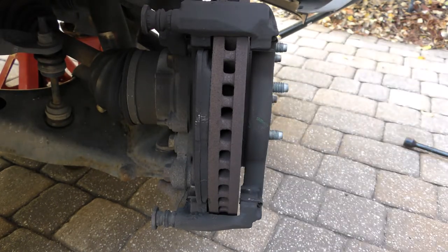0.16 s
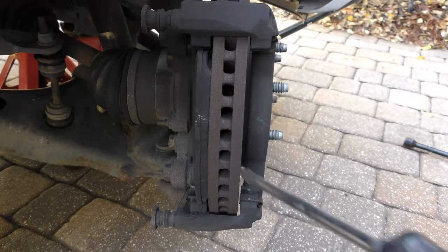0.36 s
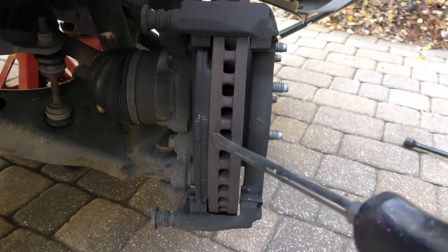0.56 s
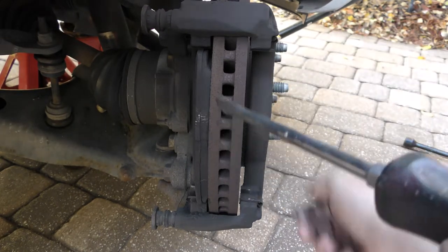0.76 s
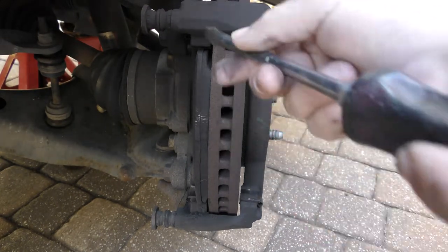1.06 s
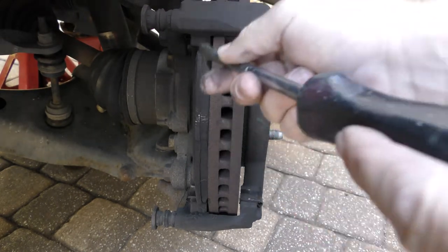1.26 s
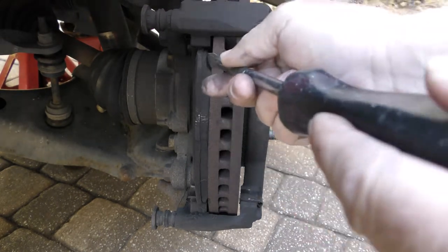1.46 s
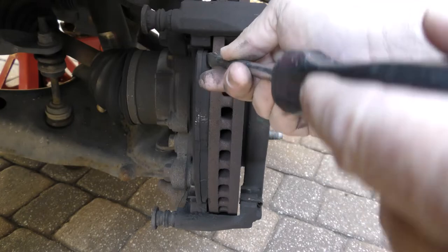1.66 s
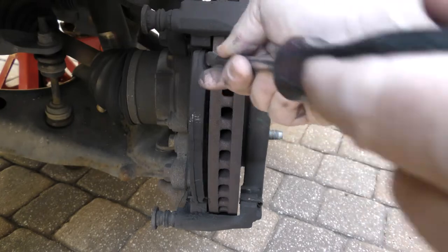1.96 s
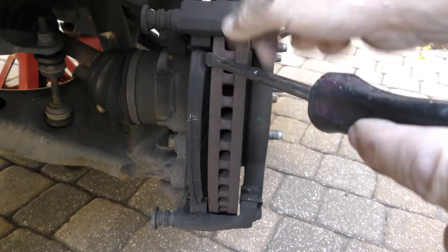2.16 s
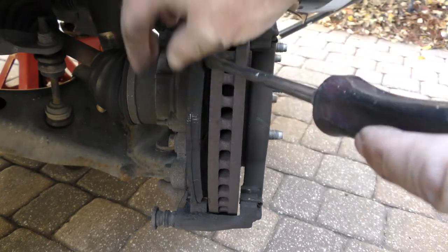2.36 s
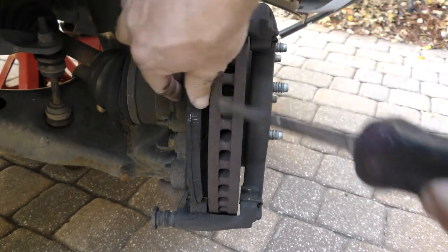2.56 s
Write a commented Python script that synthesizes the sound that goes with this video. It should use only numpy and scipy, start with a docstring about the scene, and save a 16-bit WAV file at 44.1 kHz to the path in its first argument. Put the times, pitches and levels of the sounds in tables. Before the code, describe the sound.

Close metal clinks and knocks come from a screwdriver chattering on a disc brake. It pauses, then pries at the pad with slipping clicks, brief gritty scrapes and a high clip snap, over a low outdoor rumble and faint hum.

```python
"""Sharp metal knocks come first, close by: a screwdriver chatters on a disc brake's iron caliper (its clamp).
Then the blade bites behind a brake pad, slipping and scraping along it, and the pad's spring clips
snap brightly. Each hit is a crack, a burst of fading noise and a few ringing notes. Loose parts settle
with dull thuds, fingers hiss softly on the tool, and a low outdoor rumble and faint hum lie underneath."""
import sys
import numpy as np
from scipy import signal
from scipy.fft import rfft, irfft, next_fast_len
from scipy.io import wavfile

SR = 44100
rng = np.random.default_rng(int(sys.argv[2]) if len(sys.argv) > 2 else 0)


def master(y):
    """Save y as 16-bit WAV."""
    cut = np.clip(np.atleast_2d(y).T, -1, 1)
    pcm = np.round(cut * 32767)  # scale
    wavfile.write(sys.argv[1], SR, pcm.astype(np.int16))


N = 119070
T = np.arange(N) / SR
RING_COUNT = 32768  # samples given to one hit or scrape
RING_T = np.arange(RING_COUNT) / SR
BUILD_S = .0004  # how fast ringing builds up
RATTLE_WANDER, PRESSURE_WANDER = .008, .014  # pitch wobble, as a fraction of the pitch

# Tone of the brake pad's many crowded notes: pitch_hz, level_db
PAD_SPECTRUM = [(50, -3), (250, 9.5), (520, -4), (900, -3.5), (1300, -2), (2100, -1.5), (3300, 5),
                (4100, -2), (5200, -4.5), (5900, -5.5), (7000, -7.5), (11000, -5), (13000, -12.5),
                (16000, -19)]


def caliper_knocks():
    """The blade bounces on the iron: glancing blows ring the tool's shaft, square ones make it clang."""
    # Blows on the caliper: start_s, level_db, treble_db, bass_db, shaft_db, clang_db
    knocks = [(0.1054, -25, 8, -16, -30, -24), (0.2107, -12.5, 1.5, 8.5, 2, -7),
              (0.2150, -30, 14.5, 15, 10.5, -18), (0.2411, -42.5, 13, 33, 9, -17),
              (0.3217, -36, 1, 26, -23, -25), (0.3610, -13.5, -6, 7.5, 0, -13),
              (0.384, -15, -18, -7, -6, -16), (0.393, -14, -15, -3, -5, -14), (0.4004, -21.5, -1, 11, 2, 2),
              (0.41, -10, -3.5, -3, -3, -8), (0.4147, -21, 10.5, 1, -13, 7.5),
              (0.4334, -7.5, -19, -20, -19, -16), (0.4426, -20.5, -10, -4, -32, 2.5),
              (0.4789, -23.5, -1.5, 7, -0.5, -8), (0.497, -21, -23, -6, -7.5, -9),
              (0.563, -11, -14, -10, -19, 1), (0.5701, -8, 0, -0.5, -8.5, -2),
              (0.5734, -19.5, -15, 9, -2, -8), (0.5780, -8, -5, -16, -24, -1),
              (0.65, -28, -35, 7.5, -12.5, -20), (0.7125, -17, -4, 7.5, -7.5, 1)]
    # Tone of the caliper's many crowded notes: pitch_hz, level_db
    iron_spectrum = [(40, -50), (110, -14), (280, -4), (560, -8.5), (850, -6), (1150, -2), (2300, -0.5),
                     (3150, -6), (3800, -8.5), (5200, -13), (11000, -18), (16000, -28)]
    # The caliper's clear notes: pitch_hz, level_db, fade_s
    iron_notes = [(231, -33.5, 0.17), (337, -26.5, 0.035), (1140, -36, 0.39), (1390, -23.5, 0.098),
                  (1820, -21, 0.062), (2239, -22.5, 0.11), (2210, -44.5, 0.77), (3040, -44.5, 0.58),
                  (6700, -48, 0.2), (9120, -23.5, 0.04)]
    # Notes of the bending shaft, damped by the hand: pitch_hz, level_db, fade_s
    shaft_notes = [(1066, -7, 0.023), (1166, -1.5, 0.046), (4635, -20.5, 0.04), (6670, -19, 0.013),
                   (6710, -21.5, 0.036), (10370, -30, 0.036)]
    # Notes of the iron hit squarely: pitch_hz, level_db, fade_s
    clang_notes = [(2060, 1, .013), (2105, -13, .06), (3140, -17, .05), (4190, -24, .04), (4290, -21, .05)]
    out = np.zeros((2, N))
    for start_s, level_db, treble_db, bass_db, shaft_db, clang_db in knocks:
        hit = impact(level_db, crack_db=13, body_db=-10.5, body_s=.058, tail_db=-38, tail_s=1)
        hit = colour(hit, iron_spectrum, treble_db, bass_db)
        shaft = from_db(shaft_db) * ringing(shaft_notes, treble_db, vary_db=.5, wander=RATTLE_WANDER)
        clang = from_db(clang_db) * ringing(clang_notes, treble_db, vary_db=3, wander=RATTLE_WANDER)
        iron = ringing(iron_notes, treble_db, wander=RATTLE_WANDER)
        add(out, from_db(level_db) * (hit + shaft + clang + iron), start_s)
    return out * pan(.4)


def pad_slips(lift_s=2.444, lift_db=-50):
    """The tip catches and lets go on the pad's metal plate, whose note depends on where it is held."""
    # Slips of the tip: start_s, level_db, treble_db, bass_db, plate_hz, plate_db
    slips = [(1.1774, -28.5, -8, -9, 1420, -22), (1.2882, -24, -15, 3.5, 1248, -12.5),
             (1.3171, -14.5, -9.5, 1.5, 2014, -13), (1.3222, -19.5, -5, -12, 2193, -12.5),
             (1.371, -26.5, 2, -11, 3200, -6.5), (1.3777, -29.5, 7.5, -13, 3230, -11),
             (1.4180, -23.5, -10.5, -5, 3250, -19.5), (1.6420, -23.5, -28, -2, 2110, -21),
             (1.659, -27.5, -8, 8, 2020, -14), (1.7440, -30, -3.5, 2, 2250, -29),
             (1.79, -27, 15, -20, 3750, -9), (1.827, -28, -3, 5, 2190, -18),
             (1.9280, -28.5, 7, -23, 2760, -27), (1.9537, -36, 15, -6, 5820, -9),
             (2.1180, -37.5, 6.5, 0, 2150, -19), (2.2995, -36.5, 7.5, 2, 2060, -12),
             (2.3327, -21.5, -12.5, -4, 1966, -11), (2.4030, -23, 2, 1, 3230, -4.5),
             (2.4229, -14, 4, -12, 3150, -9), (2.4291, -21.5, -7, 1.5, 6000, -15),
             (2.444, -29.5, -3, 7, 3170, -18)]
    # The pad's clear notes: pitch_hz, level_db, fade_s
    pad_notes = [(1295, -25, 0.096), (2190, -33, 0.38), (2910, -23, 0.036), (4620, -25.5, 0.079),
                 (5600, -24, 0.03), (8700, -15.5, 0.012), (10400, -31, 0.022)]
    # Longer notes of the pad ringing free once the blade lifts: pitch_hz, level_db, fade_s
    free_notes = [(930, -4.5, 0.57), (2060, -7, 0.45), (2130, -1.5, 0.77), (2697, -9, 0.76),
                  (3700, -3, .35)]
    out = np.zeros((2, N))
    for start_s, level_db, treble_db, bass_db, plate_hz, plate_db in slips:
        hit = impact(level_db, crack_db=10.5, body_db=-8.5, body_s=.029, tail_db=-33, tail_s=.36)
        hit = colour(hit, PAD_SPECTRUM, treble_db, bass_db)
        plate = ringing([(plate_hz, plate_db, .057)], vary_db=0, wander=PRESSURE_WANDER)
        pad = ringing(pad_notes, treble_db, wander=RATTLE_WANDER)
        add(out, from_db(level_db) * (hit + plate + pad), start_s)
    add(out, from_db(lift_db) * ringing(free_notes, vary_db=0), lift_s)
    return out * pan(-2.5)


def clip_snaps():
    """Thin spring steel flicks over with a tick and a very high buzz, pitched by where it is held."""
    # Snaps of the clips: start_s, level_db, fade_s, buzz_hz, buzz_db
    snaps = [(0.1470, -17.5, 0.018, 8500, -27), (1.7848, -21, 0.02, 9400, -8),
             (1.7882, -11, 0.025, 9000, -8), (1.7900, -8.5, 0.014, 8900, -7),
             (1.7944, -16, 0.068, 10000, -6), (1.9530, -28.5, 0.1, 11350, 1.5)]
    # Tone of a clip's tick: pitch_hz, level_db
    clip_spectrum = [(200, -72), (2000, -33), (6300, -23), (8400, -1), (10300, -7), (11600, -6.5),
                     (14300, 0), (15300, -22)]
    # A clip's clear notes: pitch_hz, level_db, fade_s
    clip_notes = [(8204, -36, 0.068), (8260, -29, .045), (10180, -17, 0.031), (13800, -29, 0.04),
                  (14200, -32, 0.04)]
    out = np.zeros((2, N))
    for start_s, level_db, fade_s, buzz_hz, buzz_db in snaps:
        tick = impact(level_db, crack_db=14, body_db=-12, body_s=fade_s, tail_db=-38, tail_s=.2)
        tick = colour(tick, clip_spectrum)
        t = unsteady_time(wander=.03, rate_hz=600)
        buzz = from_db(buzz_db) * np.sin(2 * np.pi * buzz_hz * t) * fade(fade_s / 2)
        add(out, from_db(level_db) * (tick + buzz + ringing(clip_notes)), start_s)
    return out * pan(2)


def blade_scrapes(catches_per_s=3000, attack_s=.0028, release_s=.019):
    """Tiny catches on rusty steel shake the pad; two of its notes waver as the pressure changes."""
    # Strokes of the blade: start_s, length_s, level_db, treble_db, ring_db, bite_db
    strokes = [(0.079, 0.042, -57.5, 7.5, -20, -11), (1.334, 0.028, -44.5, -10, 15.5, -12),
               (1.373, 0.034, -42.5, -3.5, 5, 2), (1.471, 0.11, -55, -6.5, 2, 0.5),
               (1.63, 0.041, -50.5, 0.5, -13, 5), (1.77, 0.06, -43, 0.5, 4.5, -12),
               (1.869, 0.11, -53.5, 0, -13, 2), (2.016, 0.089, -63, 13.5, 15, -10),
               (2.335, 0.082, -40.5, -4.5, 13, -1), (2.402, 0.03, -38, 2.5, -10, -12),]
    out = np.zeros((2, N))
    for start_s, length_s, level_db, treble_db, ring_db, bite_db in strokes:
        catches = rng.random(RING_COUNT) < catches_per_s / SR
        strength = from_db(1.5 * np.minimum(rng.exponential(1, RING_COUNT), 4))
        grit = rms_one(catches * strength * stereo_noise(RING_COUNT, side_db=-13.5))
        grit *= np.minimum(RING_T / attack_s, 1) * np.exp(-np.maximum(RING_T - length_s, 0) / release_s)
        ring = from_db(ring_db) * ringing([(2170, -29, .04)], vary_db=3)
        bite = from_db(bite_db) * ringing([(3230, -24, .02)], vary_db=0)
        notes = signal.fftconvolve(grit, ring + bite, axes=1)  # every catch sets off both notes
        t = unsteady_time(PRESSURE_WANDER, rate_hz=60)
        wavering = np.array([np.interp(t, RING_T, side[:RING_COUNT]) for side in notes])
        add(out, from_db(level_db) * (colour(grit, PAD_SPECTRUM, treble_db) + wavering), start_s)
    return out * pan(-.1)


def settling_thuds(push_s=.00087):
    """The caliper and pad shift in their guides and settle, dully and with no steady pitch."""
    # Loose parts settling: start_s, level_db, pitch_hz, fade_s
    thuds = [(0.2127, -34, 248, 0.03), (0.3208, -28, 322, 0.057), (0.572, -27, 102, 0.061),
             (0.714, -37, 443, 0.11), (0.7400, -31, 283.5, 0.07), (1.83, -29, 255, 0.079)]
    out = np.zeros((2, N))
    for start_s, level_db, pitch_hz, fade_s in thuds:
        swing = np.sin(2 * np.pi * pitch_hz * unsteady_time(wander=.15, rate_hz=120))
        add(out, from_db(level_db) * swing * fade(fade_s) * (1 - np.exp(-RING_T / push_s)), start_s)
    return out


def finger_rubs():
    """Skin slides on the shaft and handle with a soft, high hiss."""
    # Slides of the fingers: start_s, length_s, level_db
    rubs = [(0.0, 0.2, -59), (1.616, 0.065, -52.5), (1.908, 0.45, -60.5)]
    # Tone of sliding skin: pitch_hz, level_db
    skin_spectrum = [(1000, -22), (6000, -10), (9000, -1), (12000, 5), (14500, 0.5), (16000, -12)]
    level = np.zeros(N)
    for start_s, length_s, level_db in rubs:
        progress = np.clip((T - start_s) / length_s, 0, 1)
        level += from_db(level_db) * np.sqrt(np.abs(np.sin(np.pi * progress)))
    return level * colour(stereo_noise(N, side_db=-16.5), skin_spectrum)


def outdoors(hum_hz=159.4, waver_hz=4, waver_db=2.5, rumble_top_hz=230):
    """A distant rumble and a wavering hum sit a little to the right, under a faint, wide hiss."""
    # Tone of the outdoor noise: pitch_hz, level_db
    air_spectrum = [(15, -69), (25, -12), (161, -1), (263, -7.5), (427, -12.5), (818, -22), (962, -16.5),
                    (1370, -23), (2110, -22.5), (2910, -29.5), (3430, -29), (5430, -37.5), (11900, -33.5),
                    (16000, -38)]
    # Loudness of the outdoor noise: time_s, level_db
    air_levels = [(0, -47), (.4, -45.5), (.9, -49.5), (1.5, -47), (2.1, -47), (2.7, -48)]
    # Loudness of the hum: time_s, level_db
    hum_levels = [(0, -68), (1.1, -63.5), (1.55, -44), (1.9, -51.5), (2.2, -56.5), (2.7, -50.5)]
    air = colour(stereo_noise(N, side_db=-8.5), air_spectrum)
    air *= from_db(np.interp(T, *np.transpose(air_levels)))
    rumble = keep_lows(air, rumble_top_hz, order=1)
    level_drift, phase_drift = rms_one(keep_lows(rng.standard_normal((2, N + SR)), waver_hz)[:, SR:])
    hum_db = np.interp(T, *np.transpose(hum_levels)) + waver_db * level_drift
    hum = from_db(hum_db) * np.sin(2 * np.pi * hum_hz * T + .5 * phase_drift)
    return (rumble + hum) * pan(-3) + (air - rumble) * pan(.5)


def impact(force_db, crack_db, body_db, body_s, tail_db, tail_s):
    """One blow: a crack, the part's noisy ring behind it, and a faint echo from the wheel well."""
    body = from_db(body_db) * fade(body_s) * stereo_noise(RING_COUNT, side_db=-6.5)
    tail = from_db(tail_db) * fade(tail_s) * stereo_noise(RING_COUNT, side_db=-7)
    contact_s = .00002 * from_db(-.6 * force_db)  # a lighter touch lasts longer, so it sounds duller
    crack = np.exp(-RING_T / contact_s)
    return (body + tail) * (1 - np.exp(-RING_T / BUILD_S)) + from_db(crack_db) * crack / crack.sum()


def ringing(notes, treble_db=0, vary_db=2, spread_db=5.5, wander=0):
    """One blow sets off a part's notes, each with its own strength and left-right position."""
    t = unsteady_time(wander, rate_hz=150)
    out = np.zeros((2, RING_COUNT))
    for pitch_hz, level_db, fade_s in notes:
        strength = from_db(level_db + tone_db(pitch_hz, treble_db, 0) + vary_db * rng.normal())
        sign = rng.choice([-1, 1])
        position = pan(spread_db * rng.normal())
        out += strength * sign * position * np.sin(2 * np.pi * pitch_hz * t) * fade(fade_s)
    return out * (1 - np.exp(-t / BUILD_S))


def unsteady_time(wander, rate_hz):
    """A clock that runs fast and slow, as changing pressure pulls a ringing part's pitch about."""
    drift = keep_lows(rng.standard_normal(RING_COUNT + 2048), rate_hz)[2048:]
    return np.cumsum(1 + wander * rms_one(drift)) / SR


def colour(x, spectrum, treble_db=0, bass_db=0):
    """Give a sound the tone in a spectrum table, then turn its treble and bass up or down."""
    size = 2 * next_fast_len(x.shape[-1] // 2 + 2048)
    hz = np.maximum(np.arange(size // 2 + 1) * SR / size, 1)
    pitch_hz, level_db = np.transpose(spectrum)
    gain = rms_one(from_db(np.interp(np.log(hz), np.log(pitch_hz), level_db)))
    gain *= from_db(tone_db(hz, treble_db, bass_db))
    # These steps make the filter ring only after a hit, never before it.
    cepstrum = irfft(np.log(gain))
    cepstrum[1:size // 2] *= 2
    cepstrum[size // 2 + 1:] = 0
    return irfft(rfft(x, size) * np.exp(rfft(cepstrum)))[..., :x.shape[-1]]


def tone_db(hz, treble_db, bass_db, treble_hz=4140, bass_hz=620):
    """A hard contact lifts the treble, a heavy one the bass."""
    return treble_db / (1 + (treble_hz / hz) ** 4) + bass_db / (1 + (hz / bass_hz) ** 4)


def fade(fade_s):
    """A level that falls by 60 dB in fade_s seconds."""
    return from_db(-60 * RING_T / fade_s)


def keep_lows(x, top_hz, order=2):
    """Soften everything above top_hz."""
    return signal.sosfilt(signal.butter(order, top_hz, fs=SR, output="sos"), x)


def stereo_noise(size, side_db):
    """White noise, mostly alike in both ears."""
    mid, side = rng.standard_normal((2, size))
    return mid + from_db(side_db) * side * np.array([[1], [-1]])


def pan(left_db):
    """Gains that make the left side left_db louder than the right."""
    return from_db(np.array([[left_db], [-left_db]]) / 2)


def add(out, x, start_s):
    """Mix x in at start_s."""
    i = int(start_s * SR)
    out[:, i:i + x.shape[-1]] += x[..., :N - i]


def from_db(db):
    """Turn decibels into a multiplier."""
    return 10 ** (np.asarray(db) / 20)


def rms_one(x):
    """Scale to an average power of 1."""
    return x / np.sqrt(np.mean(x ** 2) + 1e-20)


def scene():
    """The work at the brake over the outdoor background."""
    brake = caliper_knocks() + settling_thuds() + pad_slips() + clip_snaps() + blade_scrapes()
    return brake + finger_rubs() + outdoors()


def record(dry, low_cut_hz=33, high_cut_hz=16000):
    """The microphone thins the deepest rumble; the highest treble is cut steeply."""
    thinned = signal.sosfilt(signal.butter(2, low_cut_hz, "high", fs=SR, output="sos"), dry)
    return signal.sosfilt(signal.ellip(10, .2, 80, high_cut_hz, fs=SR, output="sos"), thinned)


dry = scene()
out = record(dry)
master(out)
```